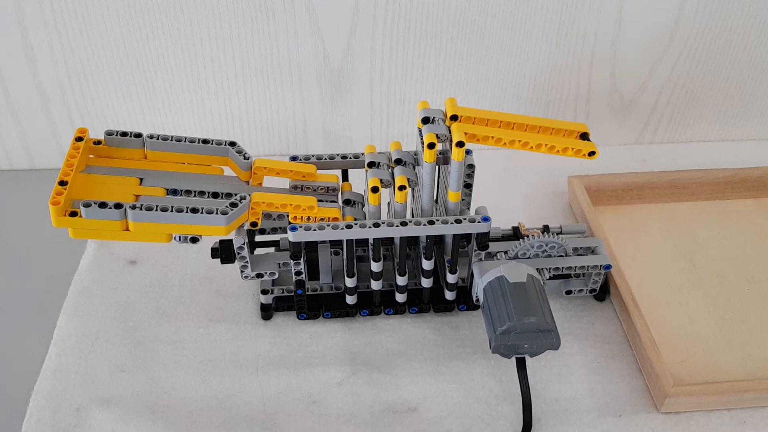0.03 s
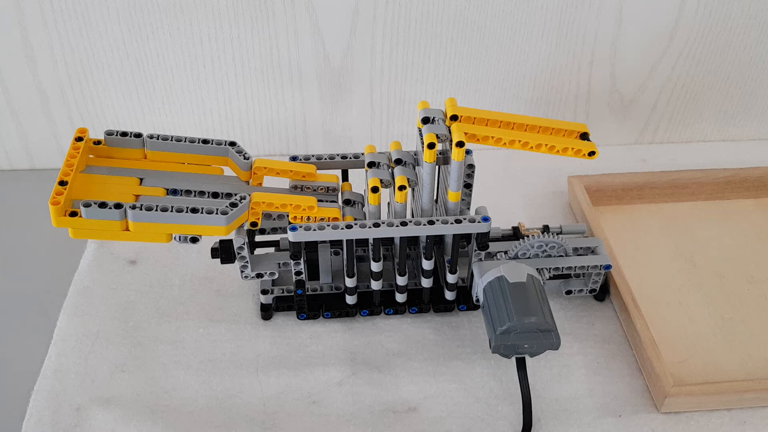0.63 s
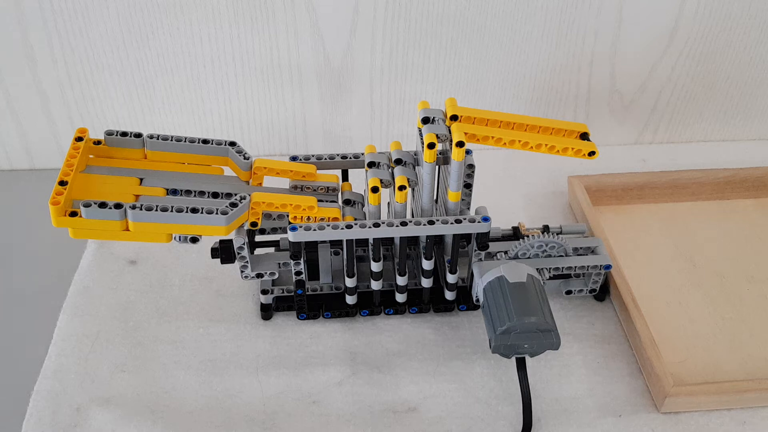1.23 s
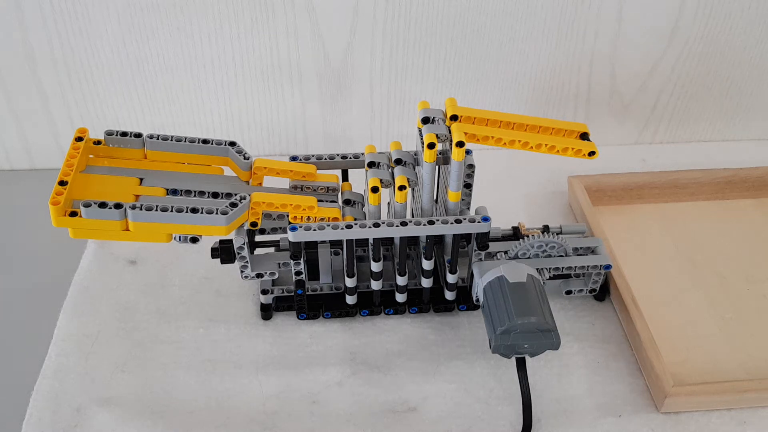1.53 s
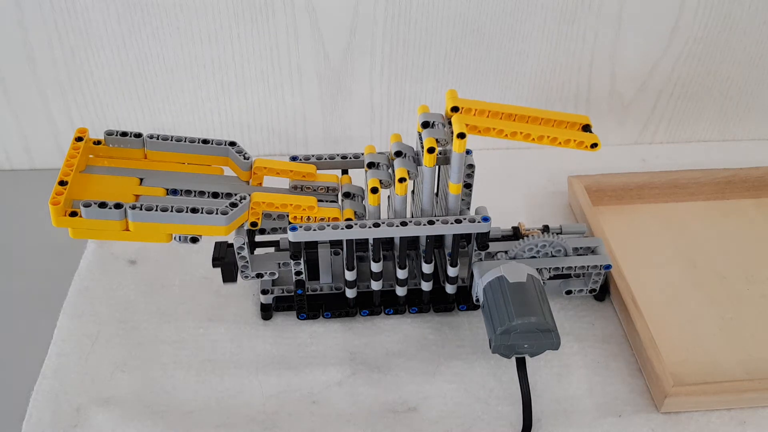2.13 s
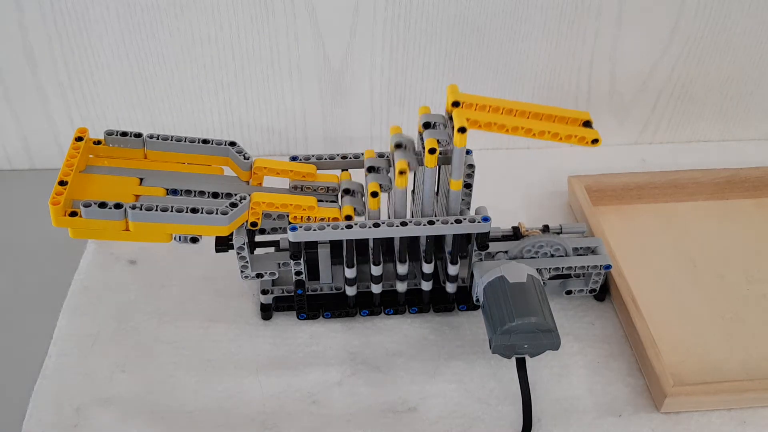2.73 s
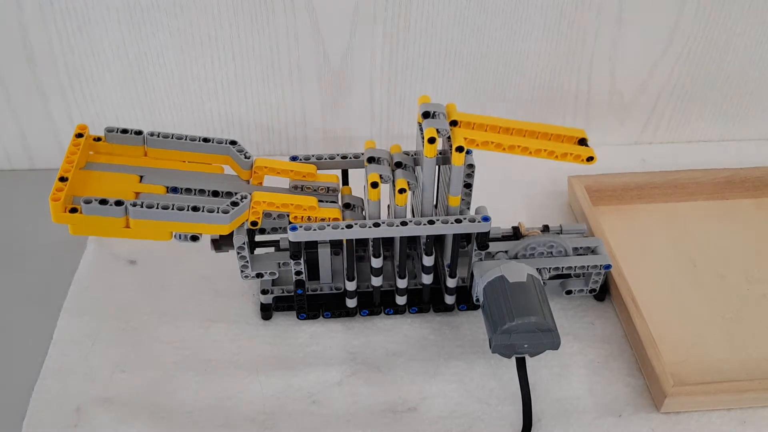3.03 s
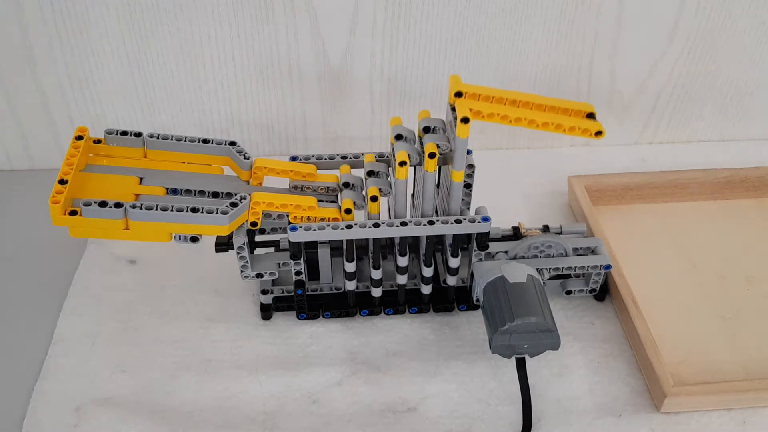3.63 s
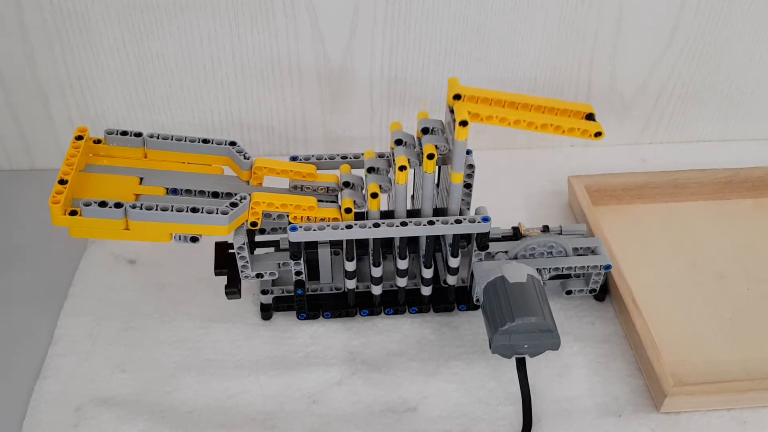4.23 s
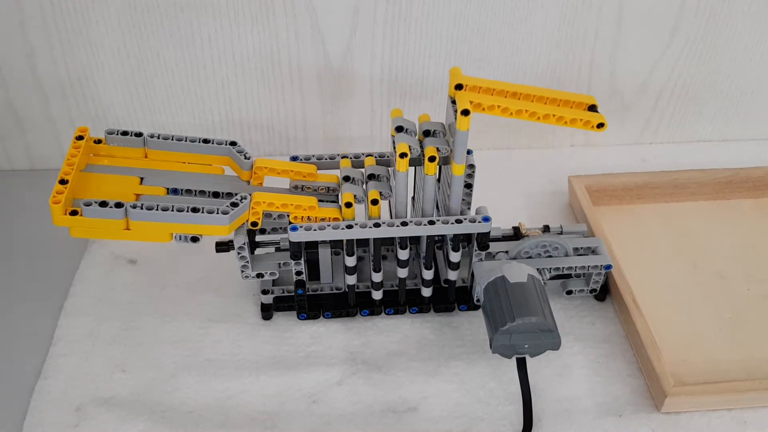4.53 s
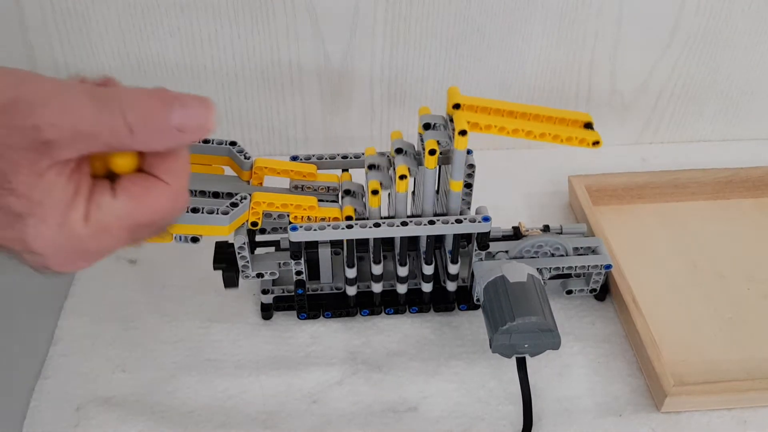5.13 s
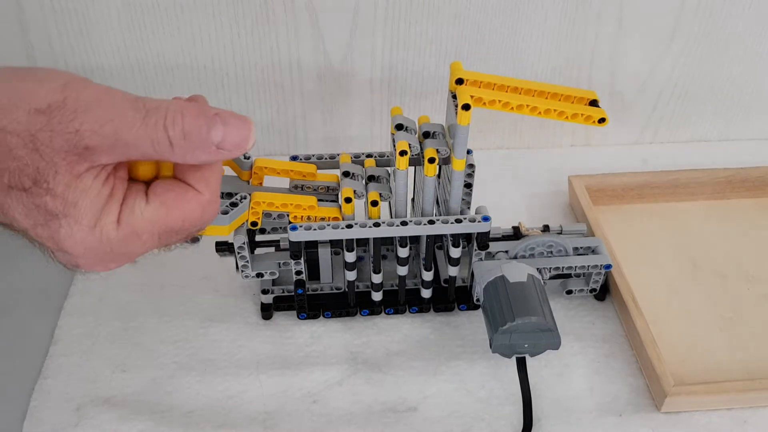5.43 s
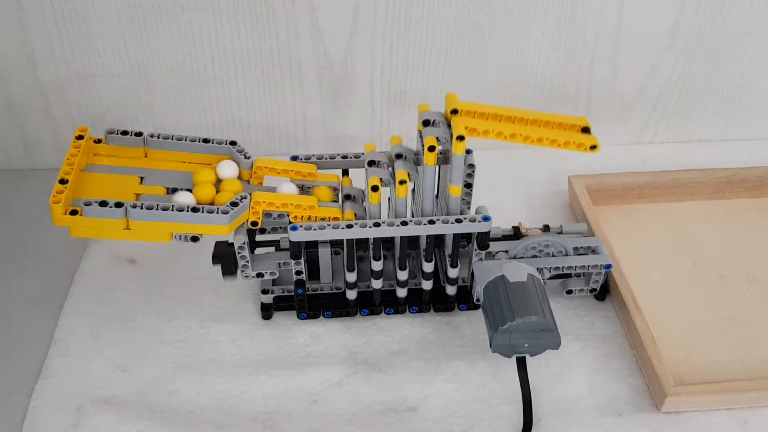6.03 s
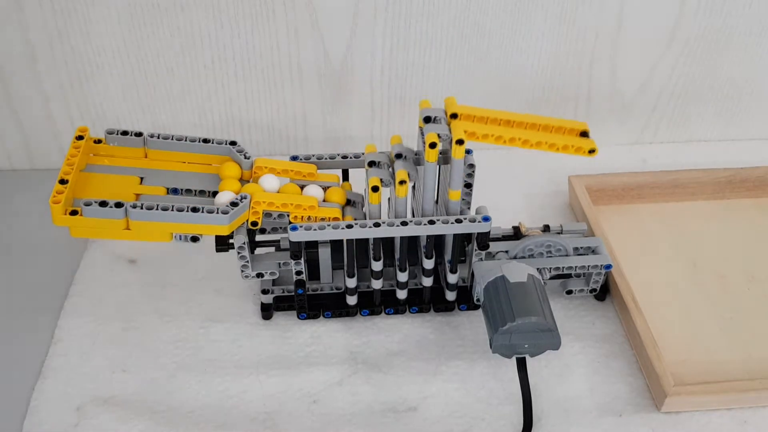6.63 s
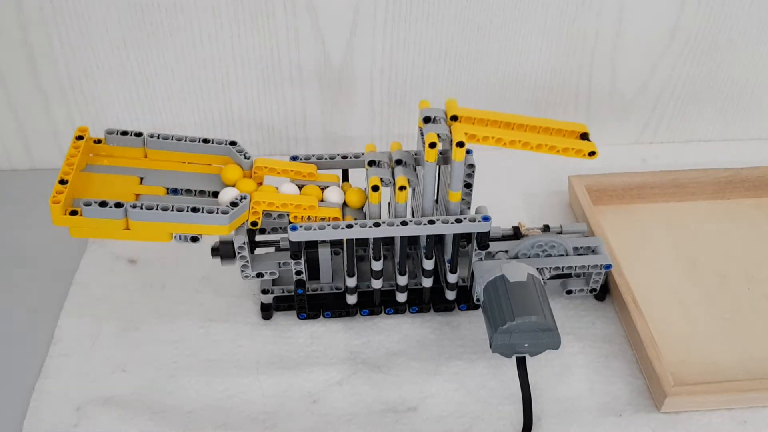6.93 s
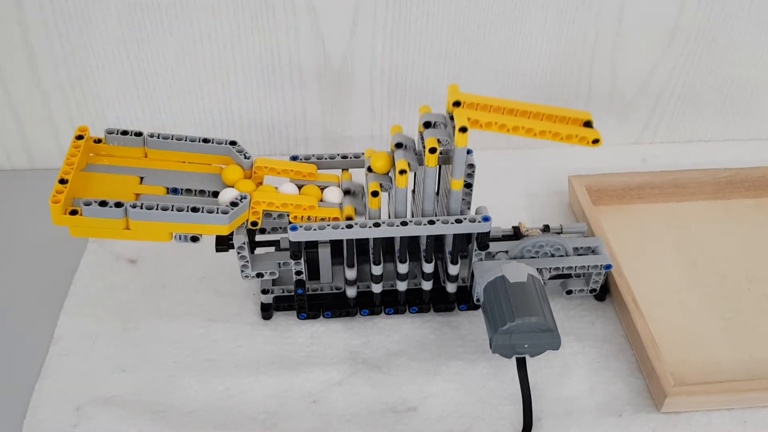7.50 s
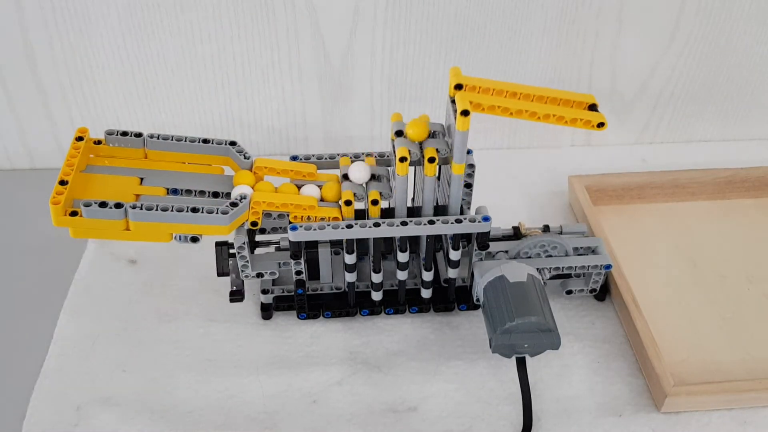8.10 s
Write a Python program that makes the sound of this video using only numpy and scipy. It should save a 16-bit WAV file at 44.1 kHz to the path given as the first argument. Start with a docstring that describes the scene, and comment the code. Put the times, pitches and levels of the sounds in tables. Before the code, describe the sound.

A quiet, low room hum is heard at first. At about 1.7 seconds there is a faint knock and a soft hiss. From 1.9 seconds a small electric motor spins up and drives a plastic ball-lifting machine on a table, with a few sharper knocks around 2.3 seconds as loose parts engage. The gears settle into a steady, slightly rasping whirr with scattered axle ticks and a low table rumble. From 3.1 seconds the lifters drop about once a second, each with a plastic clack and a soft thump. At 5.4 seconds plastic balls rattle briefly in a fist. At 5.8 and 6.1 seconds two fall into the plastic hopper with sharp, briefly ringing cracks, the loudest sounds. Until the end at about 8.4 seconds, balls click irregularly against each other and the lifters while the machine keeps running. Everything sounds fairly close, with light room reverberation.

```python
"""A room hums. At 1.7 s a knock and a soft hiss are heard; then a small electric motor spins up and drives
a plastic ball-lifting machine on a table. Gear teeth mesh and slide, slack parts knock, axles tick.
From 3.1 s the cams drop the lifters once a turn, with a clack of the frame and a thump of the table.
At 5.4 s plastic balls rattle in a fist; at 5.8 and 6.1 s two fall into the hopper and set it ringing.
To the end, balls click against each other and the lifters."""
import sys
import numpy as np
from scipy import signal
from scipy.fft import rfft, irfft, next_fast_len
from scipy.io import wavfile

SR = 44100
rng = np.random.default_rng(int(sys.argv[2]) if len(sys.argv) > 2 else 0)


def unload_wav(signal):
    """Save mono or channel-first audio to the path in sys.argv[1] as 16-bit WAV at rate SR, clipped to [-1, 1]."""
    wavfile.write(
        sys.argv[1],
        SR,
        np.round(np.clip(np.atleast_2d(signal).T, -1, 1) * 32767).astype(np.int16),
    )


N = 368676
TIME = np.arange(N) / SR

# Room: reverberation (f/Hz, T60/s), left-right coherence (f/Hz, correlation), hum (f/Hz, level/dB)
REVERB_TIME = [(100, 0.24), (300, 0.61), (1000, 0.6), (1900, 0.67), (4600, 0.44), (9000, 0.4),
               (16000, 0.079)]
COHERENCE = [(30, 0.25), (65, 0.62), (130, 0.9), (300, 0.82), (640, 0.64), (1400, 0.44), (3000, 0.52),
             (6000, 0.0086)]
HUM_LINES = [(49, -58), (100, -55.5), (138, -61), (200, -68), (300, -70)]
# Spectral envelopes of noises and contacts (f/Hz, relative level/dB)
AIR_SPECTRUM = [(20, -31.5), (45, 4.5), (62, -6.5), (78, -3.5), (108, -1), (155, -12.5), (340, -18.5),
                (480, -26.5), (750, -38.5), (1500, -42.5), (3000, -44.5), (5500, -47.5), (9000, -47.5),
                (12500, -38.5), (16000, -41)]
HISS_SPECTRUM = [(1500, -13), (2600, -9), (3600, 2), (8000, 2), (11000, 2), (16000, -5)]
TABLE_SPECTRUM = [(20, -33), (40, -22), (60, 4), (85, 2), (115, -3.5), (150, -23), (200, -14.5),
                  (300, -30.5), (600, -44.5)]
CLICK_SPECTRUM = [(250, -7.5), (1200, -9.5), (2500, -3), (10000, 1.5), (12500, 3), (16000, -9)]
FIST_SPECTRUM = [(200, -12), (430, -4), (700, -5.5), (900, -4.5), (2000, -4.5), (4000, 1.5), (8000, 1.5),
                 (11000, 2), (16000, -8)]
FALL_SPECTRUM = [(250, 2), (1500, -0.5), (5500, -6.5), (7500, -5), (10000, -8.5), (12500, -27),
                 (16000, -20)]
CAM_SPECTRUM = [(250, 1.5), (700, 0), (1400, 3), (10000, -11), (16000, -11.5)]
MESH_SPECTRUM = [(100, -4), (250, -7.5), (420, -10), (560, -20.5), (800, -12.5), (1200, -7.5), (1900, -9),
                 (2600, -12), (3600, -9.5), (4300, -0.5), (5000, -2), (6500, -10), (10000, -14),
                 (16000, -50)]
SLIDE_SPECTRUM = [(1000, -24), (2500, -8), (4500, -5), (5800, 1), (8000, 0), (9000, -6.5), (10500, -6),
                  (12000, -10), (16000, -14.5)]
# Resonances of bodies and cavities (f/Hz, bandwidth/Hz, gain/dB)
AIR_MODES = [(1036, 93, 11.4), (3320, 130, 12), (3560, 160, 9.5), (7200, 540, 3)]
HAND_MODES = [(906, 140, 10.6), (1270, 200, 10.7), (1860, 390, 8.4), (2610, 250, 5.8), (3530, 330, 2.4),
              (4480, 370, 2.1), (6900, 490, 2)]
HOPPER_MODES = [(265, 45, 8.2), (450, 150, 8.8), (705, 160, 5.1), (1065, 110, 8.1), (1495, 100, 7),
                (1740, 100, 2.8), (2007, 230, 8.3), (2520, 710, 7.2), (3930, 260, 4.6), (4520, 390, 4.1),
                (5100, 600, 4.5)]
FRAME_MODES = [(408, 120, 9.5), (660, 90, 3), (1200, 170, 2), (1450, 500, 2.5), (2040, 360, 1.5),
               (2690, 690, 6), (4430, 500, 5)]
AXLE_MODES = [(5780, 130, -4.5), (8100, 330, -1.5), (10100, 750, 1.5)]
GEARBOX_MODES = [(562, 53, 11), (659, 74, 9.5), (914, 50, 2.5), (1330, 90, 1), (1585, 76, 6.5),
                 (2040, 270, 8.5), (2910, 87, 8.5), (4198, 180, 11.5), (4555, 140, 9.5)]
# Low modes of the table (f/Hz, relative level/dB)
TABLE_MODES = [(68, 0), (112, 5), (185, -4.5)]
# The four bands of an impact: knock, clack, snap, tick (lower f/Hz, upper f/Hz)
BANDS = [(250, 800), (800, 2500), (2500, 7000), (7000, 16000)]
# Offset of each band (level/dB); the falls list clack, snap and tick only
CLICK_BAND_DB = [-8.5, -4, 0, 6]
FALL_BAND_DB = [-3.5, .3, -5.5]
DROP_BAND_DB = [-11, 1, 0.5, 8.5]
# Play in axles and linkage is taken up (t/s, level/dB, strongest f/Hz, rise time/s)
SLACK_KNOCKS = [(1.664, -63.5, 1520, 0.0026), (1.884, -50.5, 480, 0.013), (1.921, -55.5, 4200, .001),
                (1.984, -52.5, 560, .008), (2.279, -33, 1000, 0.00022), (2.331, -49, 700, .002),
                (2.401, -36, 754, 0.0018), (2.422, -43, 4200, 0.00093), (2.791, -44, 2800, .001),
                (3.367, -40, 7980, .001), (3.488, -43, 6000, 0.00065), (4.341, -39.5, 3200, 0.0016)]
# Balls strike each other and the lifters (t/s, level/dB, decay time/s, f/Hz of the struck part)
BALL_CLICKS = [(5.767, -44, 0.0034, 4300), (6.267, -46, .001, 5000), (6.684, -32.5, 0.0047, 2740),
               (6.748, -42.5, 0.0011, 9150), (6.753, -45, .0008, 8800), (6.929, -47, .0018, 4270),
               (7.079, -43, 0.0022, 5500), (7.086, -34.5, .0016, 4060), (7.173, -43.5, .0025, 6500),
               (7.396, -43, 0.0022, 9600), (7.443, -43.5, 0.0035, 6480), (7.692, -34, 0.0033, 2600),
               (7.976, -43, 0.00097, 9700), (8.256, -47.5, .002, 4330)]
# Balls collide in the fist (t/s, level/dB)
FIST_CLACKS = [(5.427, -25.5), (5.454, -31), (5.472, -29.5), (5.479, -25), (5.485, -24.5), (5.521, -26.5),
               (5.543, -28), (5.558, -26.5), (5.563, -28.5), (5.6353, -24)]
# Balls land in the hopper (t/s, level/dB, knock-band level/dB)
HOPPER_FALLS = [(5.827, -20.5, -30), (6.1316, -22.5, -36.5)]
# Lifters drop off their cams (t/s, level/dB)
LIFTER_DROPS = [(3.1, -39.5), (4.057, -39.5), (5.0105, -40), (5.938, -42.8), (6.883, -43.5), (7.83, -44.5)]
# Cam lobes shake the table (phase/turns, width/turns, relative level/dB)
CAM_LOBES = [(.04, 0.067, -2.5), (.315, 0.052, -3.5), (.63, .04, -6.5), (.78, 0.11, -1.5)]
# Rotor speed (t/s, f/Hz)
ROTOR_SPEED = [(1.9, 14), (2.2, 61), (2.5, 67), (2.8, 76.5), (3.3, 81), (4.0, 65), (4.7, 79), (5.5, 80),
               (6.6, 70.7), (8.36, 84)]
# Base levels of the loaded gears (t/s, meshing level/dB, sliding level/dB)
GEAR_LOAD = [(1.95, -68, -72), (2.09, -50, -68), (2.2, -47, -56), (2.38, -45, -49.5), (2.9, -45, -43.5),
             (3.3, -45, -40.5), (4.4, -45.5, -43.5), (5.45, -45, -42), (6.0, -48, -44.5),
             (6.45, -49.5, -46), (6.8, -48, -45.5), (8.36, -48, -46.5)]
MOTOR_START_S = ROTOR_SPEED[0][0]


def amp(db):
    """Amplitude ratio of a level."""
    return 10 ** (np.asarray(db) / 20)


def unit(x):
    """Normalisation to an rms of 1."""
    return x / np.sqrt(np.mean(x ** 2) + 1e-20)


def over_frequency(points, hz):
    """Interpolation on a logarithmic frequency axis."""
    f, value = np.transpose(points)
    return np.interp(np.log(hz + 1), np.log(f), value)


def over_time(rows, column=1):
    """Linear interpolation in time."""
    rows = np.asarray(rows)
    return np.interp(TIME, rows[:, 0], rows[:, column])


def add(mix, start_s, sound):
    """Superposition of a sound on the mix."""
    part = mix[:, max(round(start_s * SR), 0):][:, :sound.shape[1]]
    part += sound[:, :part.shape[1]]


def wander(hz):
    """Random fluctuation: low-pass noise of rms 1."""
    f = np.fft.rfftfreq(N, 1 / SR)
    return unit(irfft(rfft(rng.standard_normal(N)) * np.exp(-(f / hz) ** 2), N))


def colour(x, spectrum=None, modes=()):
    """Minimum-phase filtering by envelope and resonances; long waves are partly shared by both channels."""
    size = 2 * next_fast_len(x.shape[1] // 2 + 2048)
    hz = np.fft.rfftfreq(size, 1 / SR)
    db = over_frequency(spectrum, hz) if spectrum else np.zeros(len(hz))
    for f, width, peak_db in modes:
        db = db + peak_db / (1 + (2 * (hz - f) / width) ** 2)
    cepstrum = irfft(np.log(amp(db)))
    cepstrum[1:size // 2] *= 2  # folding makes the filter causal
    cepstrum[size // 2 + 1:] = 0
    z = rfft(x, size)
    angle = np.arcsin(np.clip(over_frequency(COHERENCE, hz), -1, 1)) / 2
    blended = np.cos(angle) * z + np.sin(angle) * z[::-1]
    return irfft(blended * np.exp(rfft(cepstrum)))[:, :x.shape[1]]


def noise(spectrum, modes=()):
    """Filtered Gaussian noise of rms 1."""
    return unit(colour(rng.standard_normal((2, N)), spectrum, modes))


def burst(crack_s, ring_s, ring_db, size=6000):
    """Exponential decay: a short crack, then the dense ringing of loosely joined plastic."""
    t = np.arange(size) / SR
    return rng.standard_normal((2, size)) * (np.exp(-t / crack_s) + amp(ring_db) * np.exp(-t / ring_s))


def at_level(x, db):
    """Equal energy: a transient gets that of 20 ms at this level."""
    return x * amp(db) * np.sqrt(.02 * SR / (x ** 2).sum(1).mean())


def band_levels(hz, db, db_per_octave):
    """Spectral roll-off on both sides of the struck part's pitch."""
    centres = np.sqrt(np.prod(BANDS, axis=1))
    return db - db_per_octave * abs(np.log2(centres / hz))


def impact(contact, spectrum, modes, levels_db):
    """Impact excitation: where and how hard a body is struck sets the energy of each band."""
    ringing = colour(contact, spectrum, modes)
    filters = (signal.butter(3, edges, "band", fs=SR, output="sos") for edges in BANDS)
    bands = (signal.sosfilt(sos, ringing) for sos in filters)
    return sum((-1) ** k * at_level(band, db) for k, (band, db) in enumerate(zip(bands, levels_db)))


def from_left(x, samples=10):
    """Path difference: sound from the left arrives later on the right."""
    return np.array([x[0], np.roll(x[1], samples)])


def room(x, wet_db, delay_s=.008):
    """Reverberation: table and wall reflect first, then a diffuse tail dies fastest in the treble."""
    t = np.arange(SR // 2) / SR
    echoes = rng.standard_normal((2, len(t))) * (rng.random((2, len(t))) < .15) * (t > delay_s)
    hz, s, z = signal.stft(echoes * (1 + 1.97 * np.exp(-t / 0.014)), SR, nperseg=256)
    decay = amp(-60 * s / over_frequency(REVERB_TIME, hz)[:, None])
    tail = signal.istft(z * decay, SR, nperseg=256)[1]
    tail /= np.linalg.norm(tail, axis=1, keepdims=True)
    return x + amp(wet_db) * colour(signal.fftconvolve(x, tail, axes=1)[:, :N])


def cam_swell(phase, width):
    """Periodic modulation: a pulse of height 1 at one phase of each cam turn, counted from the drop."""
    drops = np.array(LIFTER_DROPS)[:, 0]
    turn_s = np.diff(drops).mean()
    turns = TIME / turn_s + np.interp(TIME, drops, np.arange(len(drops)) - drops / turn_s)
    distance = (turns - phase + .5) % 1 - .5
    return np.exp(-(distance / width) ** 2)


def room_hum(air_db=-53, waver=0.2):
    """A line spectrum, wavering in phase and amplitude, lies over the room's steady low noise."""
    out = amp(air_db) * noise(AIR_SPECTRUM, AIR_MODES)
    for hz, db in HUM_LINES:
        tone = np.sin(2 * np.pi * hz * TIME + waver * wander(5.2))
        out += amp(db) * np.sqrt(2) * tone * (1 + waver * wander(3.8))
    return out


def hiss(start_s=1.723, length_s=0.14, attack_s=0.067, release_s=0.11, db=-54):
    """Soft, bright noise rises just before the motor starts and decays exponentially."""
    t = TIME - start_s
    envelope = np.clip(t / attack_s, 0, 1) * np.exp(-np.maximum(t - length_s, 0) / release_s)
    return amp(db) * envelope * noise(HISS_SPECTRUM)


def tabletop(steady_db=-12, build_s=0.81):
    """Forced vibration: the table rumbles in proportion to the drops and swells at each cam lobe."""
    lobe_power = sum((amp(db) * cam_swell(phase, width)) ** 2 for phase, width, db in CAM_LOBES)
    shake = np.sqrt(amp(steady_db) ** 2 + lobe_power)
    onset = np.sqrt(np.clip((TIME - MOTOR_START_S) / build_s, 0, 1))
    return noise(TABLE_SPECTRUM) * shake * onset * amp(over_time(LIFTER_DROPS)) * amp([[2], [-2]])


def linkage(ticks_per_s=7, tick_hz=6500, tick_rise_s=.0007):
    """Backlash: slack parts knock as the load shifts; dry axles tick at random, louder as teeth rasp."""
    out = np.zeros((2, N))
    tick_samples = np.flatnonzero((rng.random(N) < ticks_per_s / SR) & (TIME > MOTOR_START_S))
    tick_db = over_time(GEAR_LOAD, column=2) - 6.5 + 2 * rng.uniform(-0.8, 1, N)
    ticks = [(TIME[i], tick_db[i], tick_hz, tick_rise_s) for i in tick_samples]
    for s, db, hz, rise_s in SLACK_KNOCKS + ticks:
        contact = burst(crack_s=0.0029 + rise_s, ring_s=0.014, ring_db=-12)
        contact *= 1 - np.exp(-TIME[:contact.shape[1]] / rise_s)
        add(out, s, impact(contact, CAM_SPECTRUM, FRAME_MODES, band_levels(hz, db, db_per_octave=7.5)))
    return room(from_left(out), wet_db=-9)


def ball_clicks(shell_hz=8400):
    """Free vibration: a rolling ball's shell and the part it strikes each ring at their own pitch."""
    out = np.zeros((2, N))
    for s, db, decay_s, hz in BALL_CLICKS:
        contact = burst(crack_s=decay_s, ring_s=4 * decay_s, ring_db=-13)
        modes = [(hz, 0.35 * hz, 7), (shell_hz, 600, 4)]
        levels_db = band_levels(hz, db, db_per_octave=4.5) + CLICK_BAND_DB
        add(out, s, impact(contact, CLICK_SPECTRUM, modes, levels_db))
    return room(from_left(out) * amp([[.6], [-.6]]), wet_db=-3)


def fist(tip_from_s=5.49, tip_to_s=5.575, nudges=6, nudge_db=-33.5):
    """Cavity resonance: a hollow hand colours the balls' clacks, and lighter nudges as it tips."""
    out = np.zeros((2, N))
    nudge_times = tip_from_s + (tip_to_s - tip_from_s) * (np.arange(nudges) + rng.random(nudges)) / nudges
    for s, db in FIST_CLACKS + [(s, nudge_db) for s in nudge_times]:
        contact = burst(crack_s=.003, ring_s=.007, ring_db=-22)
        contact *= 1 - np.exp(-TIME[:contact.shape[1]] / 0.0019)
        add(out, s, at_level(colour(contact, FIST_SPECTRUM, HAND_MODES), db))
    return room(from_left(out, samples=5) * amp([[.5], [-.5]]), wet_db=-8.5)


def hopper():
    """Impulse response: the sharp crack of a falling ball excites the modes of the plastic tray."""
    out = np.zeros((2, N))
    for s, db, knock_db in HOPPER_FALLS:
        contact = burst(crack_s=0.00045, ring_s=0.0081, ring_db=-9.5)
        add(out, s, impact(contact, FALL_SPECTRUM, HOPPER_MODES, [knock_db, *np.add(FALL_BAND_DB, db)]))
    return room(from_left(out) * amp([[.5], [-.5]]), wet_db=-8)


def lifters(rise_s=0.0036, second_landing_s=.0055, thump_delay_s=0.00835, thump_gain_db=5.5):
    """Damped modes: each drop lands twice, ringing the frame, and thumps the table's low modes."""
    out, t = np.zeros((2, N)), np.arange(SR // 4) / SR
    thump = sum(amp(db) * np.sin(2 * np.pi * hz * t) for hz, db in TABLE_MODES)
    thump *= (1 - np.exp(-t / 0.0094)) * np.exp(-t / 0.023)
    for s, db in LIFTER_DROPS:
        contact = burst(crack_s=.0045, ring_s=.016, ring_db=-8)
        contact *= np.minimum(t[:contact.shape[1]] / rise_s, 1)
        add(contact, second_landing_s, .8 * burst(crack_s=.003, ring_s=.014, ring_db=-7))
        add(out, s, impact(contact, CAM_SPECTRUM, FRAME_MODES, np.add(DROP_BAND_DB, db)))
        add(out, s + thump_delay_s, amp(db + thump_gain_db) * np.array([thump, thump]))
    return room(out, wet_db=-7)


def teeth(turns, per_turn, spread_db, throb, rub):
    """Shot noise: teeth tap at random over a fine rub, both strongest at one side of each rotor turn."""
    hits = rng.random(N) < per_turn * over_time(ROTOR_SPEED) / SR
    strength = amp(spread_db * np.minimum(rng.exponential(1, N), 3))
    taps = unit(hits * strength * rng.choice([-1, 1], (2, N)))
    modulation = np.exp(throb * (np.cos(2 * np.pi * turns) + 0.053 * np.cos(4 * np.pi * turns)))
    return (taps + rub * rng.standard_normal((2, N))) * modulation


def gears():
    """Impact and friction: meshing teeth ring the gearbox, dry sliding the axles; lifts swell both."""
    turns = np.cumsum(over_time(ROTOR_SPEED) * (1 + 0.005 * wander(4.4))) / SR
    running = np.clip((TIME - 1.92) / 0.088, 0, 1)
    lift = cam_swell(phase=0.25, width=0.067)
    mesh = colour(teeth(turns, per_turn=14, spread_db=2.5, throb=.22, rub=.8), MESH_SPECTRUM, GEARBOX_MODES)
    slide = colour(teeth(turns, per_turn=12, spread_db=3, throb=.34, rub=1.2), SLIDE_SPECTRUM, AXLE_MODES)
    mesh_db = over_time(GEAR_LOAD, column=1) + 2 + 0.95 * lift + 0.77 * wander(25)
    slide_db = over_time(GEAR_LOAD, column=2) + 1.5 * lift + 2.3 * wander(27)
    whirr = unit(mesh) * amp(mesh_db) + unit(slide) * amp(slide_db)
    return room(running * whirr * amp([[.6], [-.6]]), wet_db=-8.5)


def scene():
    """Superposition of room, machine and balls."""
    background = room_hum() + hiss()
    machine = gears() + tabletop() + lifters() + linkage()
    return background + machine + hopper() + ball_clicks() + fist()


def record(dry, cutoff_hz=15850):
    """Band limiting: the sound fades in at 0.1 s, is clipped at full scale and low-pass filtered."""
    fade_in = np.clip((TIME - .102) / .005, 0, 1)
    lowpass = signal.firwin(511, cutoff_hz, window=("kaiser", 9), fs=SR)
    return signal.oaconvolve(np.clip(dry * fade_in, -1, 1), lowpass[None], "same")


dry = scene()
out = record(dry)
unload_wav(out)
```